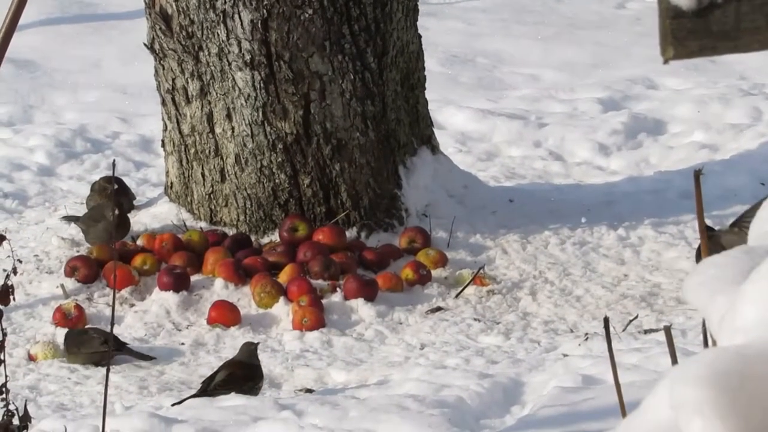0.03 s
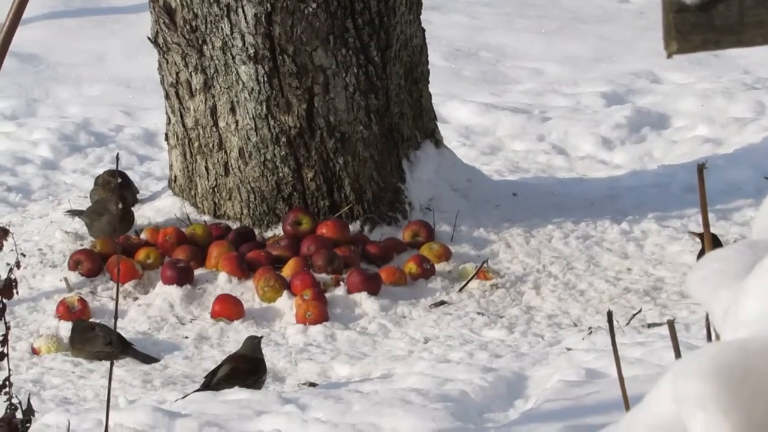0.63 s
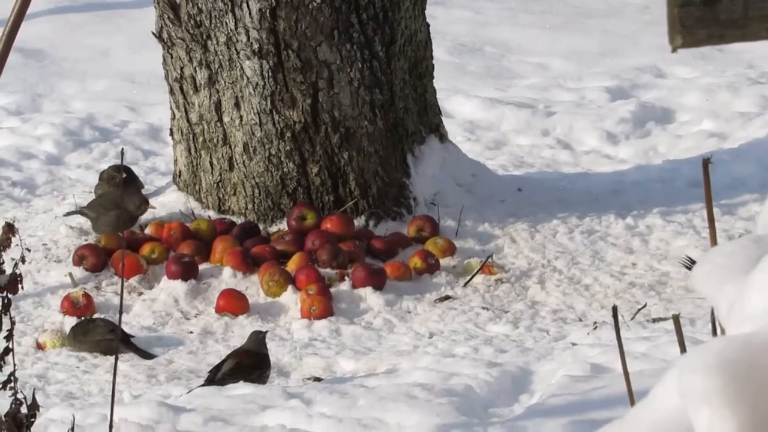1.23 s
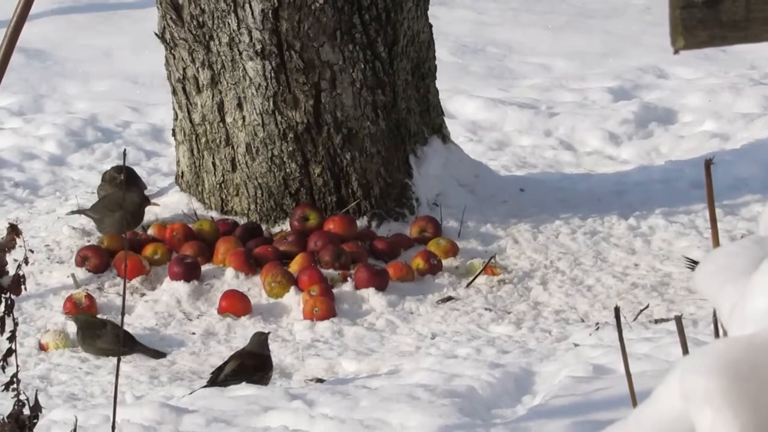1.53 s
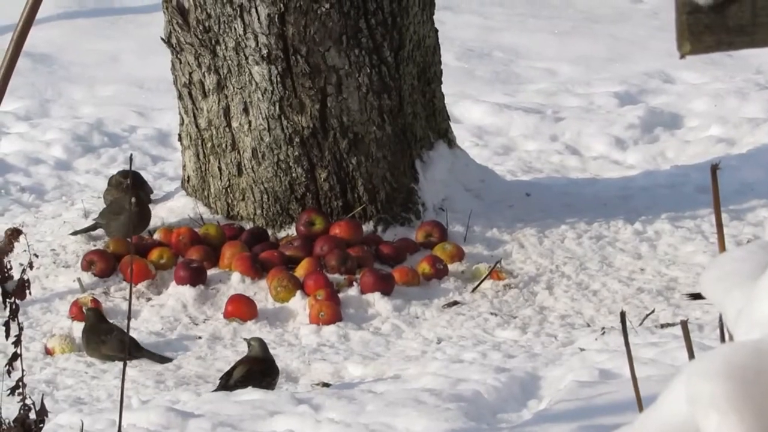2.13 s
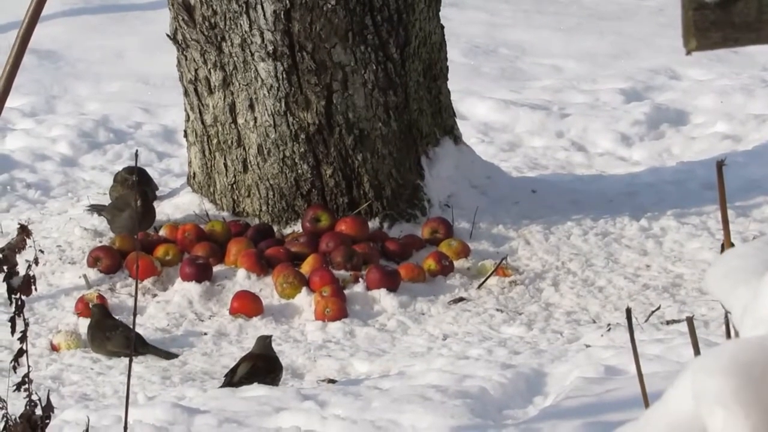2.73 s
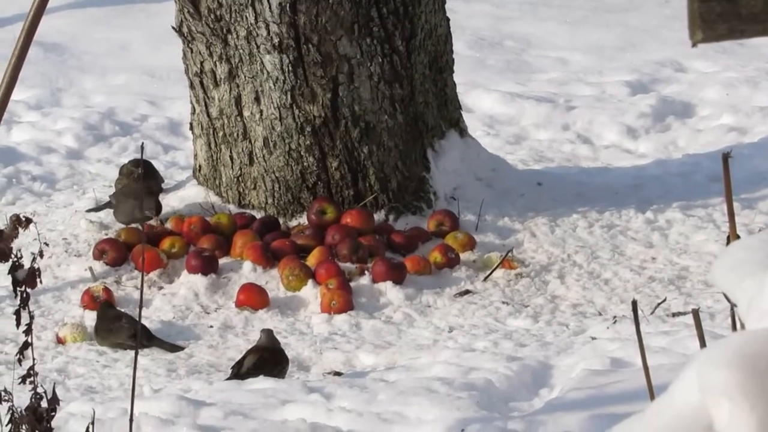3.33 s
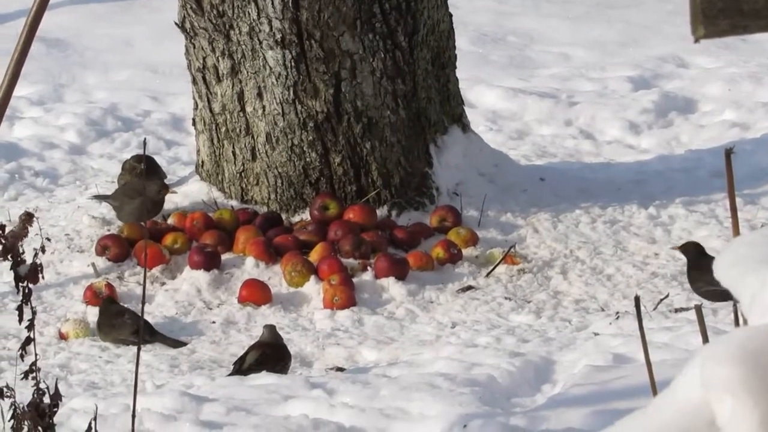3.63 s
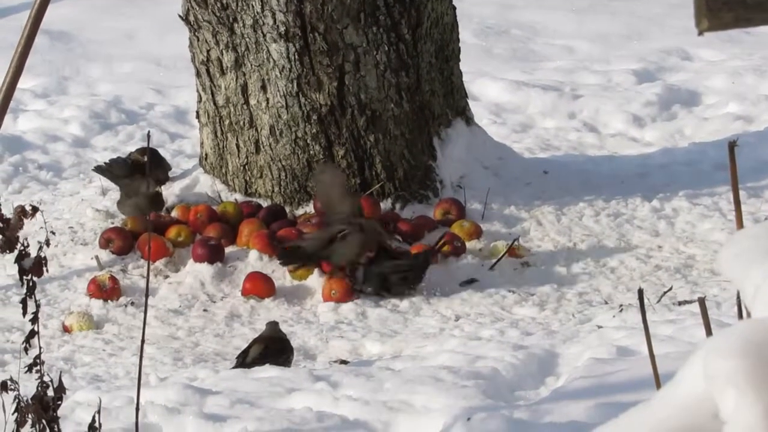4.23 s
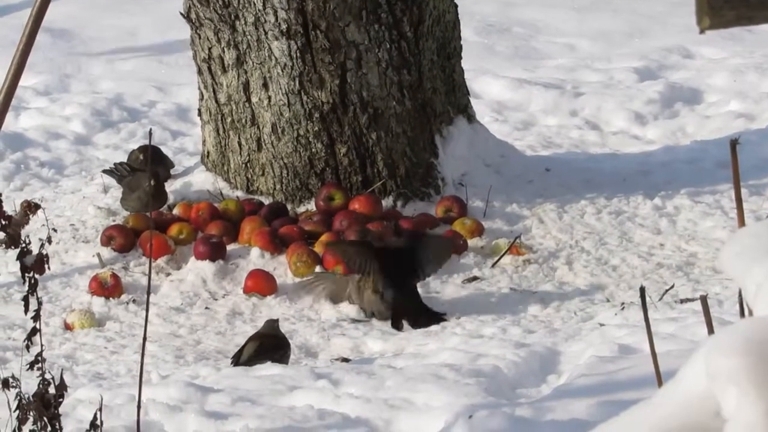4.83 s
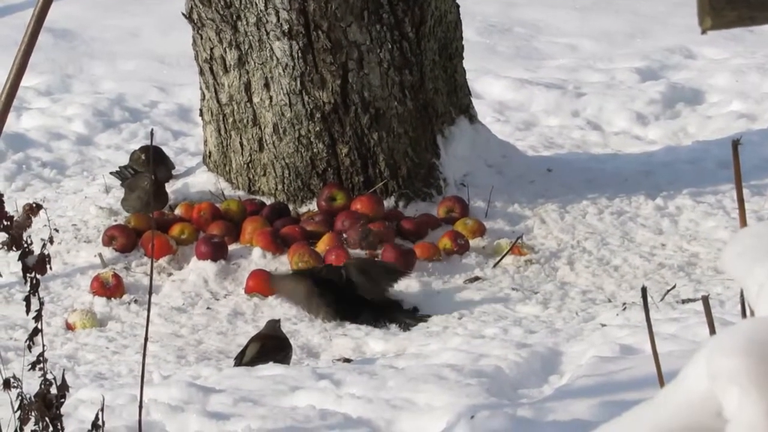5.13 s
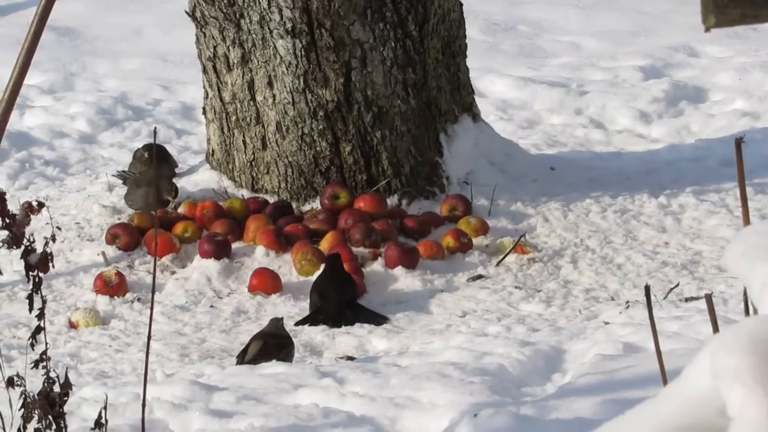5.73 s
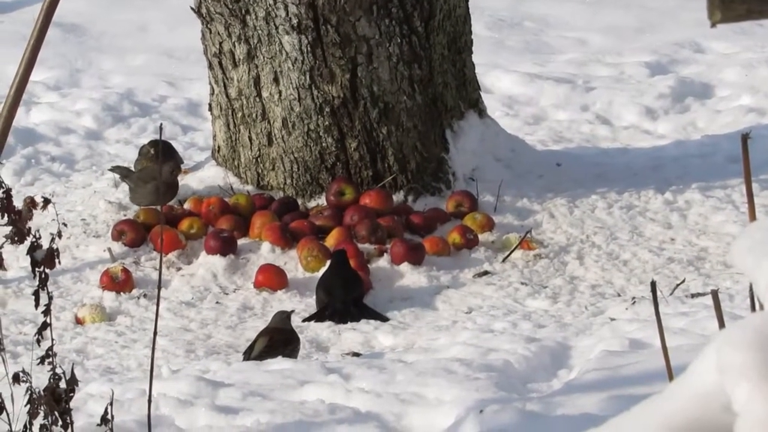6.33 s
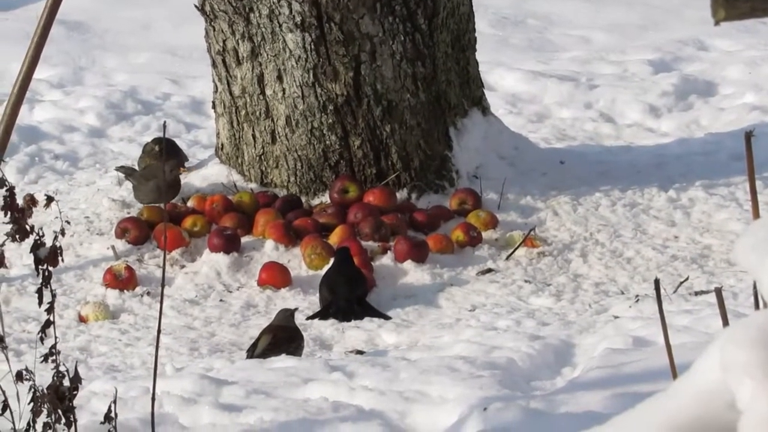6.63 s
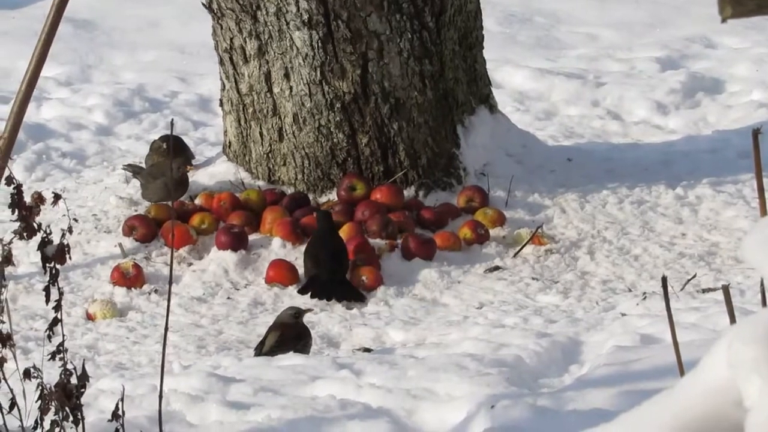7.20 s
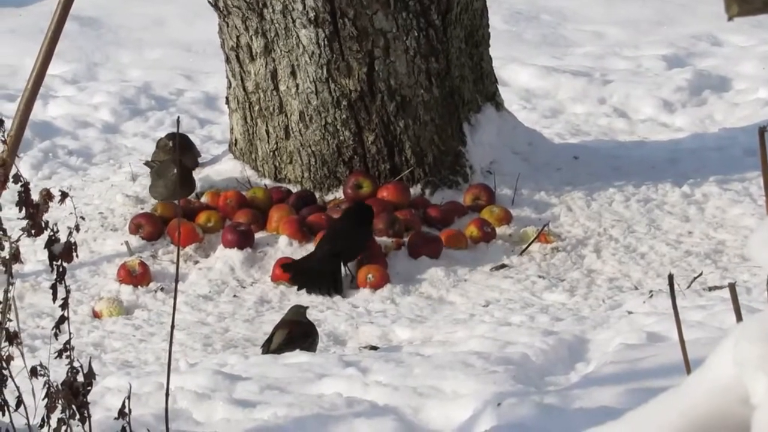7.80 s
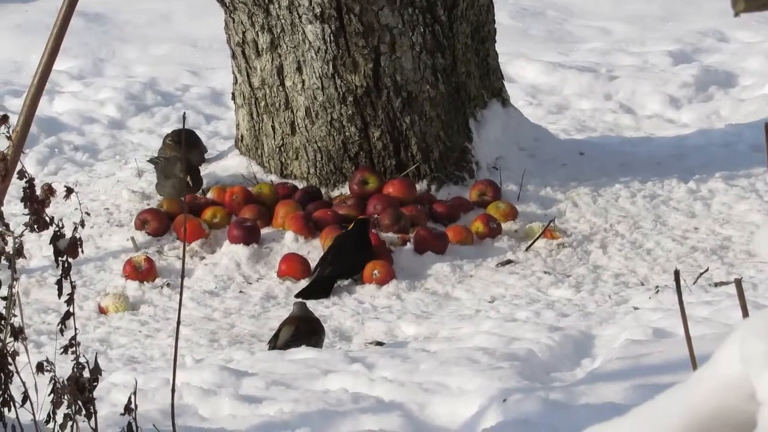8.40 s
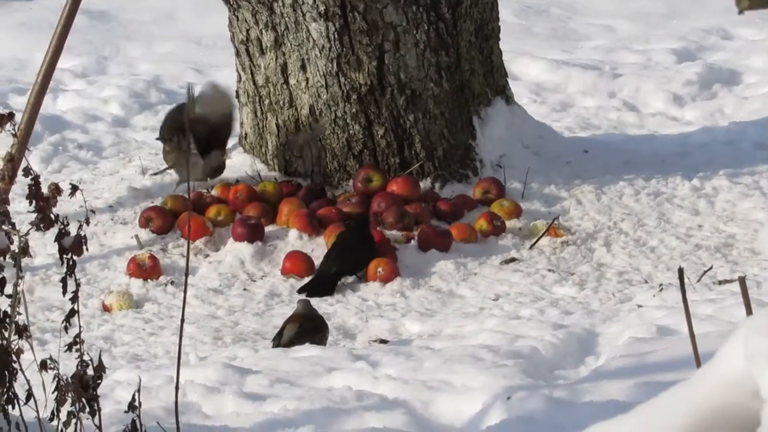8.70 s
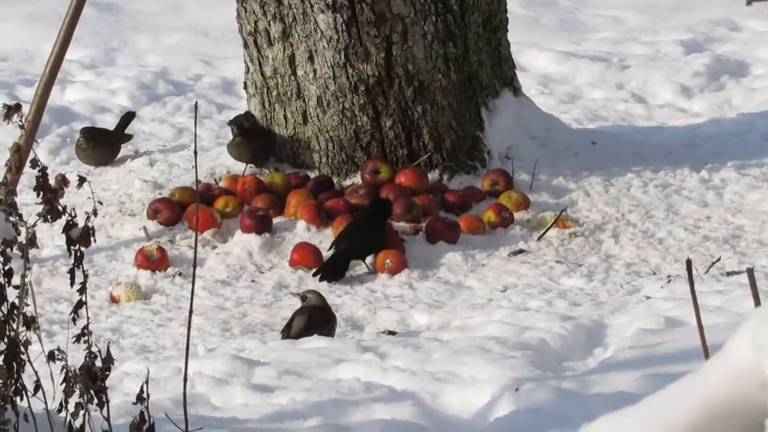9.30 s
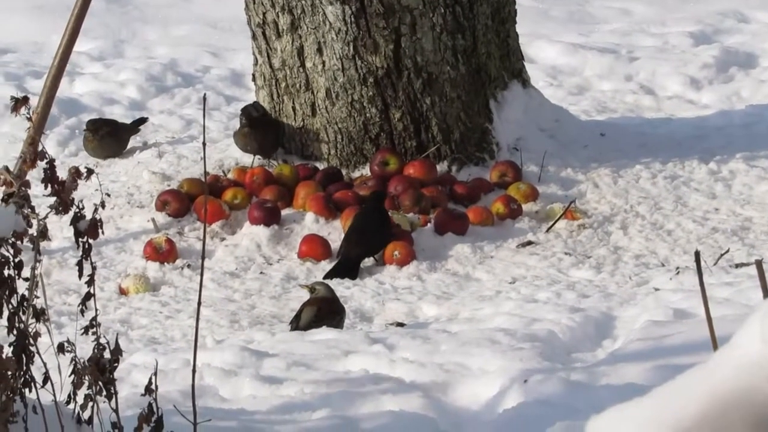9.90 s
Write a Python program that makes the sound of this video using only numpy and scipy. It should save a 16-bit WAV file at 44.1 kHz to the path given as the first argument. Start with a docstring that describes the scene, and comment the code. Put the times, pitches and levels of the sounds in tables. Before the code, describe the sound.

Birds chirp and rasp over a steady hiss, with sharp pecks and a brief scuffle of flapping wings and two shrill squeals.

```python
"""Small birds chirp in a snowy garden, over a camera's steady hiss and light air rumbling on its mic ports.
Beaks knock and snap as blackbirds squabble over fallen apples; jackdaws rasp further off.
About four seconds in the fight flares: wings rustle, feet tick on the crust and one bird squeals twice,
both sides of its syrinx sounding at once. Walls and trunks return short echoes."""
import sys
import numpy as np
from scipy import signal
from scipy.fft import rfft, irfft
from scipy.io import wavfile
from scipy.ndimage import map_coordinates

SR = 44100
rng = np.random.default_rng(int(sys.argv[2]) if len(sys.argv) > 2 else 0)


def unload_wav(signal):
    """Save mono or channel-first audio to the path in sys.argv[1] as 16-bit WAV at rate SR, clipped to [-1, 1]."""
    wavfile.write(
        sys.argv[1],
        SR,
        np.round(np.clip(np.atleast_2d(signal).T, -1, 1) * 32767).astype(np.int16),
    )


N = 438794
T = np.arange(N) / SR

# Levels in the cue lists are set ahead of each layer's trim and echoes.
# hiss EQ, shared by the ports (mid) and opposed between them (side): freq_hz, gain_db
HISS_MID_EQ = [(15, -19), (25, 4), (112, -7), (278, -3), (383, -3.5), (515, -4), (673, -3), (811, -2.5),
               (978, -6.5), (1180, -5.5), (1460, -10), (1630, -9.5), (3830, -13.5), (12100, -21),
               (15000, -35.5)]
HISS_SIDE_EQ = [(15, -28), (25, -20), (50, -25), (95, -8), (207, -10), (243, -5.5), (278, -8), (655, -10),
                (927, -12.5), (1540, -17.5), (3260, -23), (3830, -24.5), (10000, -29.5), (13800, -37),
                (15000, -45)]
# bands of distant hum: centre_hz, width_hz, level_db
HUM_BANDS = [(522, 25, -71), (846, 54, -69.5)]
# puffs of air on the ports: peak_s, half_length_s, level_db
GUSTS = [(1.4, 0.15, -40.5), (3.35, .3, -46.5), (4.7, 0.66, -48.5), (6.75, 0.35, -44), (7.92, 0.19, -38),
         (8.65, 0.41, -44), (9.42, 0.18, -37), (9.8, 0.21, -39.5)]
# soft bumps on the camera: start_s, level_db
BUMPS = [(0.569, -36), (.81, -36), (1.39, -34), (3.021, -32), (3.43, -36), (4.31, -32.5), (4.735, -35),
         (5.959, -28), (6.43, -38.5), (6.882, -36), (7.299, -31), (7.791, -30), (8.527, -24.5),
         (8.88, -31.5), (9.43, -38), (9.883, -25.5)]
# low-end EQ of opposed air, opposed bumps and the shared part of both: freq_hz, gain_db
AIR_SIDE_EQ = [(15, -16.5), (45, -4), (75, 4), (130, -12), (250, -36), (600, -54)]
BUMP_SIDE_EQ = [(20, 0), (60, 11), (140, -27), (300, -20), (800, -69)]
RUMBLE_MID_EQ = [(15, -23), (50, 5.5), (100, 1.5), (150, -2.5), (220, -15.5), (500, -42.5)]
# falling chirps, high arched calls, rising tsips, one thin whistle: start_s, pitch_hz, level_db
FALLS = [(-.04, 3720, -50), (.05, 3520, -48.5), (.479, 3210, -55), (1.401, 2820, -51.5),
         (3.135, 3404, -43.5), (3.945, 3620, -47), (4.39, 3010, -53.5), (5.668, 3415, -45),
         (6.585, 3420, -46), (7.19, 3470, -47), (7.753, 3440, -43), (8.215, 3574, -48), (8.887, 2886, -53),
         (9.463, 3520, -47.5)]
ARCHES = [(3.665, 7610, -46.5), (6.52, 7610, -48), (7.905, 7680, -48), (9.77, 7690, -49.5)]
TSIPS = [(.155, 7650, -50.5), (1.03, 7560, -46), (1.44, 7630, -48), (2.452, 7590, -48.5),
         (9.422, 7450, -44)]
WHISTLES = [(6.455, 7980, -41)]
# their contours, in even steps through the call: pitch_ratio
FALL_SHAPE, ARCH_SHAPE = (.76, 1.05, 1.02, .92, .82), (.83, .96, 1.03, .86, .79)
TSIP_SHAPE, WHISTLE_SHAPE = (.68, 1, 1.01), (1.03, .98, 1)
# pecks, wing slaps and the sharp onset of an early chirp (first row): start_s, knock_db, snap_db
TRANSIENTS = [(0.067, -46.5, -48), (1.124, -46, -48), (2.828, -50.5, -63), (3.404, -44.5, -70),
              (3.575, -37.5, -47), (4.221, -49.5, -68), (4.512, -37, -43), (4.568, -43, -64),
              (4.647, -40.5, -42.5), (4.7, -57, -46), (5.007, -43.5, -36), (5.204, -36, -48),
              (5.965, -42, -48.5), (6.135, -39, -46), (6.209, -63, -58), (6.327, -60, -52),
              (7.32, -42, -49.5), (7.485, -43, -49), (7.65, -42, -45.5), (7.816, -50, -51),
              (8.172, -46.5, -41.5), (8.521, -47, -33), (9.353, -51, -52), (9.739, -48.5, -72)]
# EQ of the dull knock and the bright snap: freq_hz, gain_db
KNOCK_EQ = [(200, -4.5), (600, 1), (1200, 3), (1800, 4.5), (3000, 0.5), (4200, -14), (8000, -35)]
SNAP_EQ = [(1500, -14.5), (3500, -6), (6500, 1.5), (10000, -3), (15000, -6.5)]
# jackdaw calls and one faint, low scuff (at 7.951 s):
# start_s, length_s, top_pitch_hz, level_db, rasp_db, overtones_db, droop_ratio
CAWS_AND_SCUFF = [(0.122, 0.07, 1276, -43.5, -8, 8, 0.12), (0.2, 0.069, 1105, -46.5, -6, -5, 0.45),
                  (1.529, 0.065, 1420, -49.5, -13, 2, 0.56), (2.44, 0.054, 1526, -36, -22, 2.5, 0.5),
                  (4.063, 0.058, 1275, -39.5, -14, 10, 0), (4.288, 0.053, 1640, -37, -8, -1, 0.36),
                  (4.349, 0.079, 1633, -42, 1, 9, 0.12), (4.792, 0.03, 1838, -43.5, -4, 6, 0.37),
                  (5.143, 0.052, 1734, -31.5, -4, -3, 0.2), (5.458, 0.062, 1466, -38, -5.5, -10, 0.47),
                  (6.427, 0.046, 1430, -42, -7, -17, 0.94), (7.01, 0.052, 1383, -48.5, -11, -4, 0.44),
                  (7.275, .048, 1593, -34, -23, 3, 0.47), (7.951, 0.077, 1110, -50, -21, -3, 0.35),
                  (8.754, 0.065, 1552, -42.5, -11.5, 0, 0.68), (9.289, 0.042, 1477, -40, -7, -12, 0.56),
                  (9.489, 0.05, 1412, -49.5, -25, 1, 0.17), (9.816, 0.043, 1570, -37, -17.5, -2, 0.32)]
# bouts of flapping: peak_s, half_length_s, level_db
FLAP_BOUTS = [(4.075, .025, -54), (4.54, 0.22, -54), (4.95, 0.09, -48.5), (5.23, 0.11, -51.5)]
# EQ of brushing feathers: freq_hz, gain_db
FEATHER_EQ = [(100, 9), (400, -18), (1000, 3), (2200, 3), (4000, 4), (7000, 1), (11000, 2), (15000, -3)]
# blackbird squeals: start_s, length_s, pitch_hz, level_db, roughness_ratio, upper_voice_db, octave_db
SQUEALS = [(4.894, .19, 4955, -32.5, .66, -12.5, -6), (5.148, .165, 4787, -27.5, 0.31, -1.5, -18.5)]
# the voice cracks down and recovers: centre_s, half_length_s, low_pitch_hz, gain_db, roughness_ratio
VOICE_CRACKS = [(4.975, 0.014, 2595, 2.5, 0.1), (5.036, .009, 3590, -7, 1.3)]
# surges of effort make a squeal louder, purer and a little higher: peak_s, half_length_s, gain_db
SURGES = [(5.008, 0.0074, 3), (5.052, 0.0042, 9.5), (5.182, .003, 10), (5.256, 0.0075, 12.5),
          (5.267, 0.0033, 8)]


def undb(db):
    """Decibels to gain."""
    return 10 ** (np.asarray(db) / 20)


def unit(x):
    """Scale to rms 1."""
    return x / np.sqrt(np.mean(x ** 2) + 1e-20)


def colour(x, eq):
    """Minimum-phase EQ with unit power gain."""
    hz, db = np.transpose(eq)
    size = 4096
    log_hz = np.log(np.fft.rfftfreq(size, 1 / SR) + 1)
    log_gain = np.log(undb(np.interp(log_hz, np.log(hz), db)))
    cepstrum = irfft(log_gain)[:size // 2]
    cepstrum[1:] *= 2
    response = irfft(np.exp(rfft(cepstrum, size)))
    return signal.fftconvolve(x, response / np.linalg.norm(response))[:len(x)]


def noise(eq):
    """Coloured noise with rms near 1."""
    return colour(rng.standard_normal(N), eq)


def walk(rate_hz, t=T):
    """Smooth random modulation with a spread near 1."""
    steps = (t - t[0]) * rate_hz
    values = np.random.default_rng(rng.integers(2 ** 31)).standard_normal(int(steps[-1]) + 2)
    return map_coordinates(values, [steps], order=2, mode="nearest")


def add(track, start_s, sound):
    """Mix a sound into a track, trimming any overhang."""
    start = int(start_s * SR)
    sound, start = sound[max(-start, 0):], max(start, 0)
    track[start:start + len(sound)] += sound[:N - start]


def phase_of(hz):
    """Phase of an oscillator that follows a pitch."""
    return 2 * np.pi * np.cumsum(hz) / SR


def resonance(hz, centre_hz, width_hz):
    """Gain of a resonance at a frequency."""
    return 1 / np.sqrt(1 + ((hz ** 2 - centre_hz ** 2) / (hz * width_hz)) ** 2)


def decay(t, t60_s):
    """A fade that loses 60 dB in t60_s."""
    return np.exp(-np.log(1000) * t / t60_s)


def swell(peak_s, half_length_s, t=T):
    """A smooth rise and fall that peaks at 1."""
    return np.exp(-((t - peak_s) / half_length_s) ** 2)


def swells(cues):
    """One gain curve from a list of swells."""
    return sum(undb(db) * swell(peak_s, half_s) for peak_s, half_s, db in cues)


def bursts(cues, t60_s, rise_s):
    """Noise that jumps up at each cue and dies away."""
    envelope, t = np.zeros(N), T[:SR // 2]
    shape = decay(t, t60_s) * (1 - np.exp(-t / rise_s))
    for start_s, db in cues:
        add(envelope, start_s, undb(db) * shape / shape.max())
    return envelope * rng.standard_normal(N)


def strike(eq, t60_s, rise_s):
    """One hit of coloured noise, with rms 1 over its first 5 ms."""
    t = T[:SR // 12]
    envelope = decay(t, t60_s) * (1 - np.exp(-t / rise_s))
    burst = colour(rng.standard_normal(len(t)) * envelope, eq)
    return burst / np.sqrt(np.mean(burst[:SR // 200] ** 2))


def ports(mid, side):
    """Mid and side to left and right."""
    return np.array([mid + side, mid - side])


def hiss_and_hum(base_db=-54.5, rise_db_per_s=.1714, side_db=3):
    """The bed: camera hiss creeps up over a faint, wavering distant hum."""
    hz = np.fft.rfftfreq(N, 1 / SR) + 1
    hum = 0
    for centre_hz, width_hz, db in HUM_BANDS:
        band = rfft(rng.standard_normal(N)) * resonance(hz, centre_hz, width_hz) ** 2
        hum += undb(db) * unit(irfft(band, N))
    hiss_gain = undb(base_db + rise_db_per_s * T + .3 * walk(2.68))
    hiss = ports(noise(HISS_MID_EQ), undb(side_db) * noise(HISS_SIDE_EQ))
    return hiss_gain * hiss + hum * undb(2 * walk(4))


def rumble(mid_db=-14, calm_db=-63, air_trim_db=-1):
    """Eddies and soft bumps push the two ports mostly in opposite directions."""
    eddies_db = 3 * walk(14)
    air_gain = (undb(calm_db) + swells(GUSTS)) * undb(air_trim_db + eddies_db)
    side_bumps, mid_bumps = [bursts(BUMPS, t60_s=.25, rise_s=.0019) for _ in range(2)]
    side = air_gain * noise(AIR_SIDE_EQ) + colour(side_bumps, BUMP_SIDE_EQ)
    mid = air_gain * noise(RUMBLE_MID_EQ) + colour(mid_bumps, RUMBLE_MID_EQ)
    return ports(undb(mid_db) * mid, side)


def chirps(calls, shape, length_s, rough, trim_db, held_ratio=1, held_db=-60, stray=.035):
    """One voice glides, the other holds a pitch and fades; a fast irregular trill frays both."""
    out, t = np.zeros(N), T[:int(length_s * SR)]
    progress = t / length_s
    contour = np.interp(progress, np.linspace(0, 1, len(shape)), shape)
    glide_gain = np.sin(np.pi * progress ** 1.25) ** 1.2
    held_gain = undb(held_db) * np.sqrt(progress) * (1 - progress) ** 2.6
    for start_s, pitch_hz, db in calls:
        chirp = 0
        glide_ratio = contour * (1 + stray * rough * walk(45, t))  # no two calls are quite alike
        for ratio, gain in ((glide_ratio, glide_gain), (held_ratio, held_gain)):
            trill_hz = rough * (400 * walk(1400, t) + 170 * walk(110, t))
            flutter_db = 5 * rough * walk(120, t)
            chirp += gain * np.sin(phase_of(pitch_hz * ratio + trill_hz)) * undb(flutter_db)
        add(out, start_s, undb(db + trim_db) * unit(chirp))
    return out


def small_birds():
    """Four kinds of call, each with its own contour, length and roughness."""
    falls = chirps(FALLS, FALL_SHAPE, length_s=.135, rough=.626, trim_db=-6.5, held_ratio=1.27, held_db=1)
    arches = chirps(ARCHES, ARCH_SHAPE, length_s=.19, rough=.684, trim_db=-7, held_ratio=.9, held_db=1)
    tsips = chirps(TSIPS, TSIP_SHAPE, length_s=.041, rough=.83, trim_db=-6.5)
    whistle = chirps(WHISTLES, WHISTLE_SHAPE, length_s=.166, rough=.04, trim_db=-9)
    return falls + arches + tsips + whistle


def knocks_and_snaps(knock_trim_db=1, fizz_db=-12):
    """Pecks, wing slaps and one chirp's onset: a dull knock, a bright snap and a fizz like icy crumbs."""
    out = np.zeros(N)
    for start_s, knock_db, snap_db in TRANSIENTS:
        add(out, start_s, undb(knock_db + knock_trim_db) * strike(KNOCK_EQ, t60_s=.01, rise_s=.001))
        add(out, start_s, undb(snap_db) * strike(SNAP_EQ, t60_s=.0071, rise_s=.00019))
        add(out, start_s, undb(snap_db + fizz_db) * strike(SNAP_EQ, t60_s=.059, rise_s=.0025))
    return out


def jackdaws_and_scuff(rasp_hz=540, trim_db=-3.5, wall_echo_s=.024, wall_echo_db=-10):
    """Harmonics arch through two throat resonances with a slower rasp; the scuff borrows this voice."""
    out = np.zeros(N)
    for start_s, length_s, top_hz, db, rasp_db, overtones_db, droop in CAWS_AND_SCUFF:
        t = T[:int(length_s * SR)]
        progress = t / length_s
        rasp, bright = undb(rasp_db), undb(overtones_db)
        waver = (.016 + .07 * rasp) * walk(1200, t)
        hz = top_hz * (1 - droop * (2 * progress - 1.1) ** 2) * (1 + waver)
        offset_hz = rasp_hz * hz / top_hz
        harmonics = [(hz, 1), (2 * hz, .66 * bright), (3 * hz, .5 * bright)]
        sidebands = [(hz + offset_hz, 1.2 * rasp), (hz - offset_hz, .46 * rasp)]
        tone = 0
        for partial_hz, gain in harmonics + sidebands:
            throat = resonance(partial_hz, 1510, 550) + resonance(partial_hz, 2376, 140)
            rolloff = 1 / (1 + (partial_hz / 3600) ** 8)
            tone += gain * throat * rolloff * np.sin(phase_of(partial_hz))
        envelope = np.sin(np.pi * progress) ** .85
        tone = undb(db + trim_db) * unit(tone * envelope)
        add(out, start_s, tone)
        add(out, start_s + wall_echo_s, undb(wall_echo_db) * tone)
    return out


def wings(beat_hz=17, beat_db=3, trim_db=-.5):
    """Feathers brush feathers and crusted snow: dense tiny grains that swell with each wingbeat."""
    grains = rng.standard_normal(N) * (rng.random(N) < .4)
    grains = unit(grains * undb(1.8 * rng.exponential(size=N)))
    wingbeat = np.sin(phase_of(beat_hz * (1 + .23 * walk(17))))
    flutter_db = beat_db * wingbeat + 1.2 * walk(130)
    return colour(grains, FEATHER_EQ) * swells(FLAP_BOUTS) * undb(trim_db + flutter_db)


def crust_ticks(per_s=9, level_db=-60, spread_db=4):
    """Feet and beaks tick faintly on the snow crust, at random, once the fight has begun."""
    fighting = T > FLAP_BOUTS[0][0]
    triggers = (rng.random(N) < per_s / SR) * fighting
    ticks = triggers * undb(level_db + spread_db * rng.standard_normal(N))
    return signal.fftconvolve(ticks, strike(SNAP_EQ, t60_s=.011, rise_s=.0003))[:N]


def squeals(upper_hz=5580, upper_octave_db=2, flutter_db=3, rasp_db=-9, fray_hz=400, waver_hz=220):
    """Both sides of a blackbird's syrinx sound: one cracks down, one stays high; they beat and fray."""
    attack_s, release_s, sag = .038, .0386, .092  # the pitch sags by this share at zero effort
    quaver_hz, quaver_depth = 14.5, .028
    surge_hz_per_db, purity_per_db = 6, .11
    out = np.zeros(N)
    for start_s, length_s, pitch_hz, db, roughness, upper_db, octave_db in SQUEALS:
        age = T[:int(length_s * SR)]
        t = start_s + age
        effort = np.minimum(age / attack_s, 1) * np.minimum((length_s - age) / release_s, 1)
        surge_db = sum(gain_db * swell(peak_s, half_s, t) for peak_s, half_s, gain_db in SURGES)
        quaver = -quaver_depth * np.cos(2 * np.pi * quaver_hz * age)
        low_hz = pitch_hz * (1 + quaver - sag * (1 - effort)) + surge_hz_per_db * surge_db
        loudness = effort ** 2 * undb(db + surge_db)
        rough = roughness * np.exp(-purity_per_db * surge_db)
        for centre_s, half_s, crack_hz, crack_db, crack_rough in VOICE_CRACKS:
            crack = np.exp(-np.abs((t - centre_s) / half_s) ** 3)
            low_hz += crack * (crack_hz - low_hz)
            rough += swell(centre_s, half_s / 2, t) * (crack_rough - rough)
            loudness *= undb(crack_db * crack)
        high_hz = upper_hz * (low_hz / pitch_hz) ** .35 * (1 + .018 * walk(90, t))
        lower = (low_hz, 1, undb(octave_db - surge_db / 2))
        upper = (high_hz, undb(upper_db - surge_db / 2), undb(octave_db + upper_octave_db + surge_db / 2))
        voice = 0
        for hz, gain, octave_gain in (lower, upper):
            jitter_hz = rough * (fray_hz * walk(1800, t) + waver_hz * walk(448, t))
            phase = phase_of(hz + jitter_hz)
            # the rougher the voice, the more the overtones smear into a rasp; surges of effort clear it
            rasp = sum(walk(3000, t) * np.sin(k * phase) for k in range(1, 5))
            overtones = np.sin(2 * phase) + undb(rasp_db) * 2 * rough * rasp
            tone = np.sin(phase) + octave_gain * overtones
            voice += gain * tone * undb(flutter_db * rough * walk(423, t))
        add(out, start_s, voice * loudness)
    return out


def garden(x, near_db, far_db, near_t60_s, far_t60_s=.63):
    """Direct sound, scatter from trunks and walls, and a faint tail; each port hears its own echoes."""
    t, channels = T[:SR], []
    for _ in range(2):
        near, far = rng.standard_normal((2, SR))
        near *= undb(2.36 * rng.exponential(size=SR)) * decay(t, near_t60_s) * (t > .002)
        far *= decay(t, far_t60_s) * (t > .03)
        echoes = undb(near_db) * near / np.linalg.norm(near) + undb(far_db) * far / np.linalg.norm(far)
        channels.append(x + signal.fftconvolve(x, echoes)[:N])
    return np.array(channels)


def scene(daws_right_db=2):
    """The mix: the fight dead centre, jackdaws a little to the right, small birds far off."""
    screams = garden(squeals(), near_db=-2, far_db=-26, near_t60_s=.22)
    rustle = garden(wings(), near_db=4.5, far_db=-15, near_t60_s=.11)
    clicks = garden(knocks_and_snaps() + crust_ticks(), near_db=2.5, far_db=-9.5, near_t60_s=.19)
    rasps = garden(jackdaws_and_scuff(), near_db=-2.5, far_db=-15, near_t60_s=.16)
    rasps *= undb(np.array([[-1], [1]]) * daws_right_db / 2)
    chirping = garden(small_birds(), near_db=1, far_db=-20, near_t60_s=.42)
    return screams + rustle + clicks + rasps + chirping + hiss_and_hum() + rumble()


def record(dry, notches_hz=(3970, 7940), notch_width_hz=260, top_hz=14550):
    """The camera's tone: two narrow notches and a steep high cut."""
    for hz in notches_hz:
        dry = signal.lfilter(*signal.iirnotch(hz, hz / notch_width_hz, fs=SR), dry)
    return signal.sosfilt(signal.ellip(10, .2, 80, top_hz, fs=SR, output="sos"), dry)


dry = scene()
out = record(dry)
unload_wav(out)
```